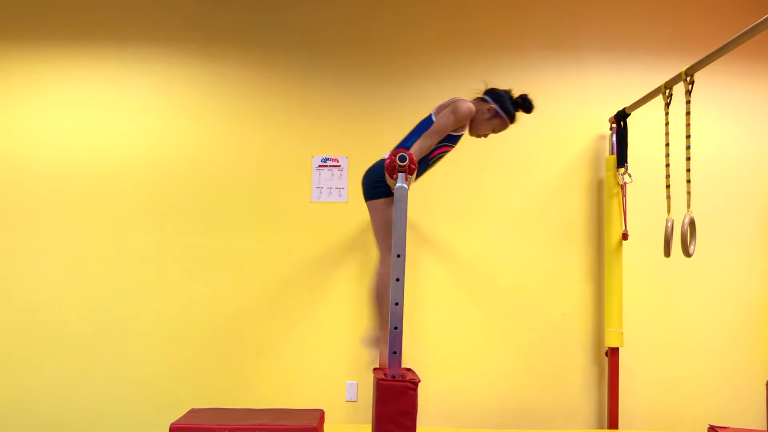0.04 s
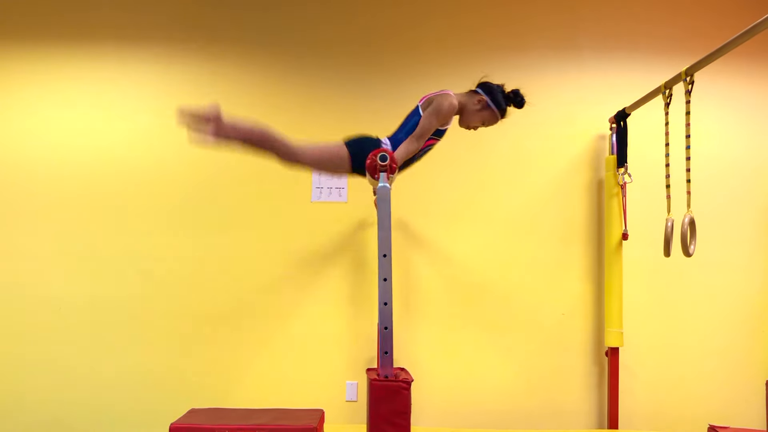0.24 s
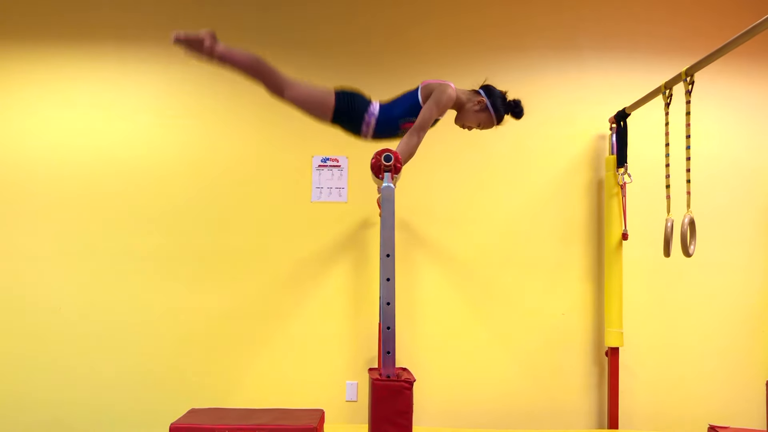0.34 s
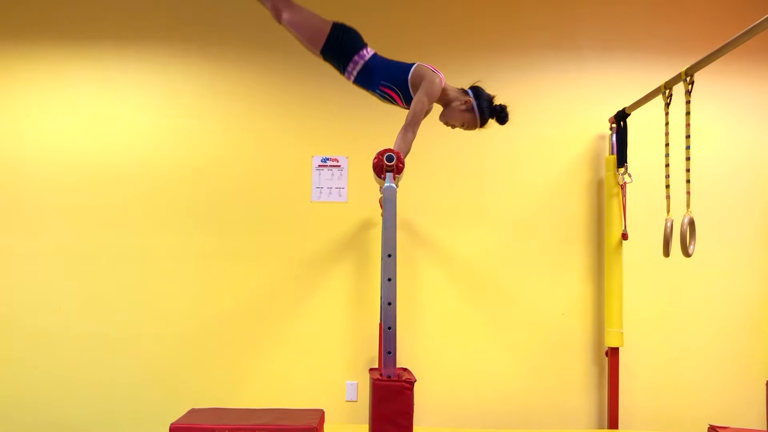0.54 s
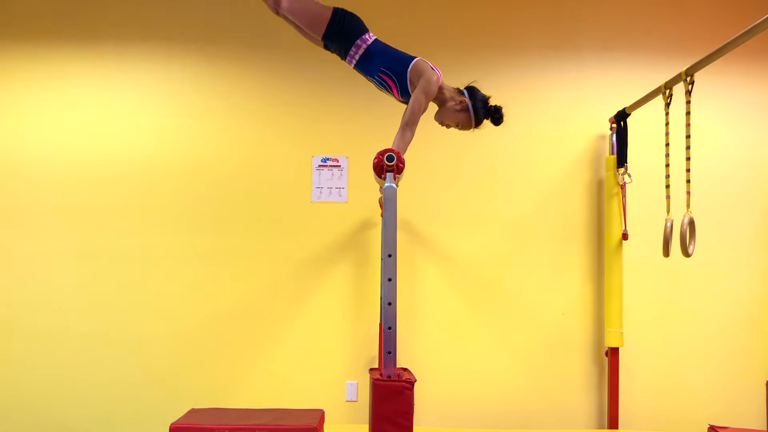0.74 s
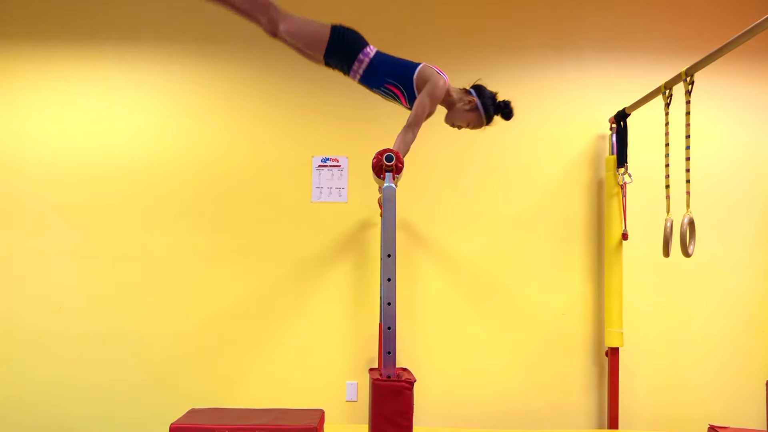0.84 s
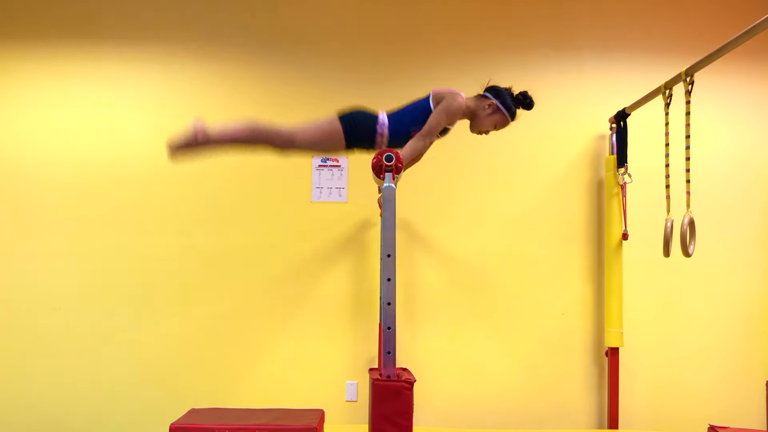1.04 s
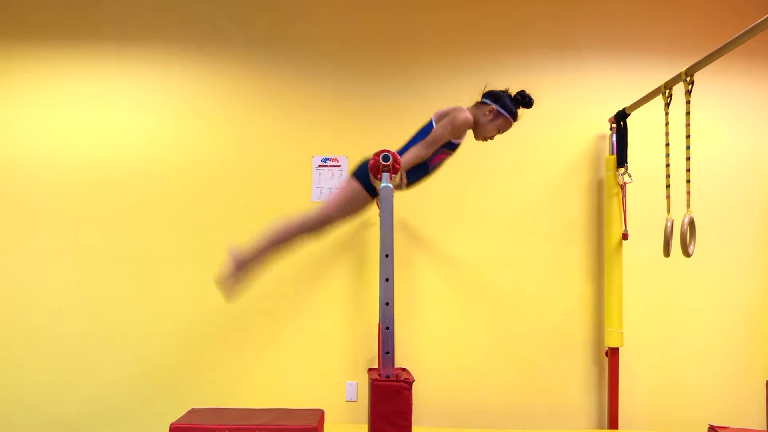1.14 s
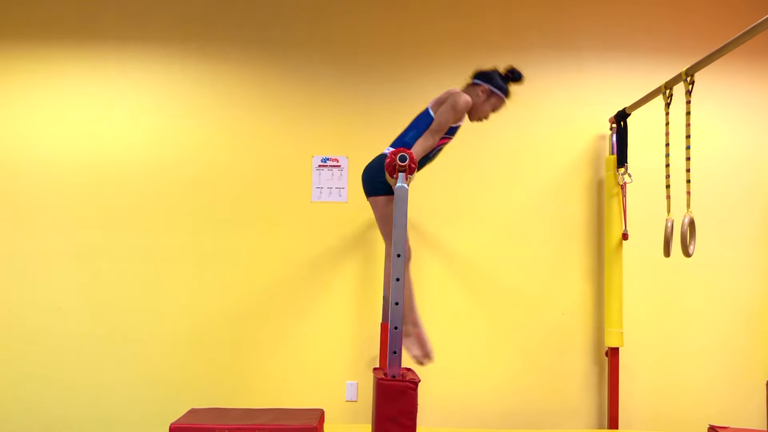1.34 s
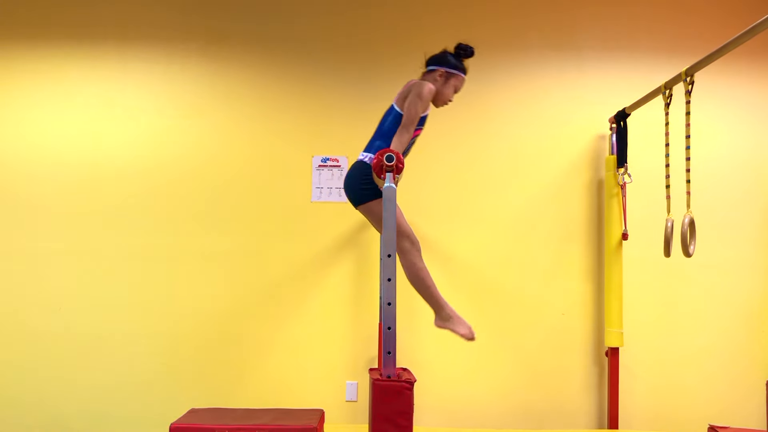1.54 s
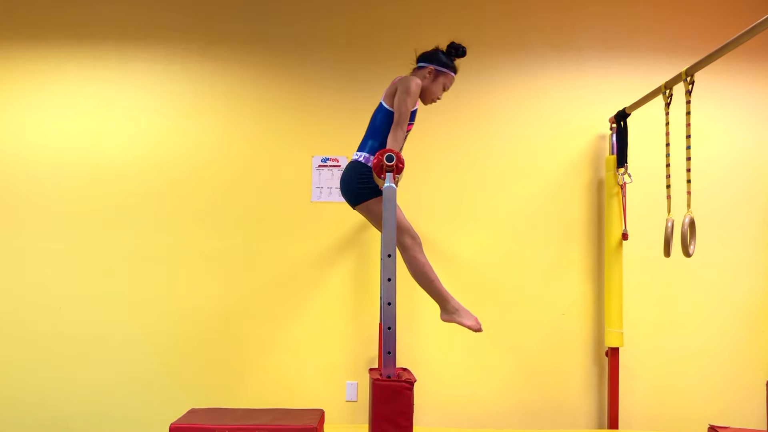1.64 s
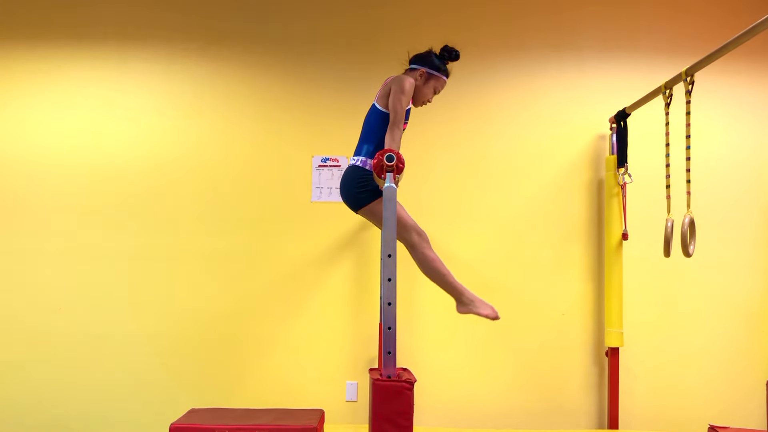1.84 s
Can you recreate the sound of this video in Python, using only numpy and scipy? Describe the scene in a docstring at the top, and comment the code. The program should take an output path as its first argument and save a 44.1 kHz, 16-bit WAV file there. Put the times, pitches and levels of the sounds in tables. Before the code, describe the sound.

A steel gymnastics bar clanks and rattles sharply as a gymnast swings off and lands back

```python
"""Gymnast on a steel bar

A gymnast swings away from a bar and back to support, in a reverberant gym, over rumbling ventilation.
The steel fittings clank and rattle in their play as the load changes: noise cracks plus ringing, blurred tones.
Her hips land on the rail with dull thuds, made of low damped sines and soft puffs of noise.
Her hands rub round it as grainy noise with a faint ring, and squeak as short gliding tones."""
import sys
import numpy as np
from scipy import signal
from scipy.fft import rfft, irfft, next_fast_len
from scipy.io import wavfile
from scipy.ndimage import map_coordinates

SR = 44100
rng = np.random.default_rng(int(sys.argv[2]) if len(sys.argv) > 2 else 0)


def generate_wav(sig):
    """Save sig (samples, or channels by samples) to the path in sys.argv[1] as 16-bit PCM at SR."""
    pcm = np.round(np.clip(np.atleast_2d(sig).T, -1, 1) * 32767).astype(np.int16)
    wavfile.write(sys.argv[1], SR, pcm)


N = 83790  # length in samples
T = np.arange(N) / SR  # time in seconds

# Colour of the ventilation's rumble. Each row: frequency in Hz, relative level in dB per Hz.
RUMBLE_COLOUR = [(20, -2), (38, -11), (55, 4), (78, -13.5), (125, -5), (200, -19.5), (400, -30.5),
                 (1000, -44), (4000, -46.5), (15000, -56.5)]
# Ventilation hum. Each row: frequency in Hz, level in dB.
HUM_TONES = [(58.5, -52.5), (115, -71.5)]
# Metal contacts in the fittings. Each row: start in seconds, level in dB, weight of the frame's low ring in dB,
# treble tilt in dB per octave, brightness limit in Hz.
METAL_CONTACTS = [(0.0376, -52, 4, 2, 10100), (0.0424, -48, -0.5, -7, 3030), (.196, -50, -1, 6, 8900),
                  (0.2384, -31, -25, 1, 6900), (0.2441, -26, -1.5, -1.5, 16000),
                  (0.2496, -29.5, -9, -0.5, 16700), (0.2554, -28, -1, 2.5, 16000),
                  (.263, -40, 1, 14, 15900), (0.286, -38.5, -24, 3.5, 11700), (0.326, -48, -11, 9, 9100),
                  (0.346, -39, -22, 5.5, 16100), (0.37, -41.5, -6.5, 1.5, 12100),
                  (0.39, -39.5, -18, 6.5, 11300), (.437, -45, -20, 4, 15800), (.452, -46, -9, 7.5, 14400),
                  (.647, -47, -8.5, -1, 3060), (0.658, -53, 0, -4, 4980), (0.767, -60.5, -12, -2, 8900),
                  (1.098, -67.5, -5, -3, 5000), (1.5276, -30.5, -6, 2, 9000), (1.536, -41.5, -1, -9, 12000),
                  (1.546, -59, -13, 1, 9100), (1.569, -39, -1, 0.5, 13600), (1.58, -38.5, -13, 1, 8100),
                  (1.595, -40, -16, -6, 12300), (1.604, -41.5, -6, 1.5, 14000), (1.616, -50, -1, 3, 9000)]
# Colour of a metal crack. Each row: frequency in Hz, relative level in dB per Hz.
CRACK_COLOUR = [(150, -10), (400, -18), (1000, -2), (2000, -3), (3900, -2.5), (4700, -6.5), (6000, -3),
                (9000, -12), (15500, -20)]
# Ringing tones of the steel fittings. Each row: frequency in Hz, relative level in dB,
# time to fall 60 dB in seconds.
STEEL_MODES = [(2256, -29, .3), (2565, -25, .8), (2688, -16, .18), (2953, -25, .2), (3713, -22, .4),
               (3785, -13, .1), (3884, -9, .06), (3954, -9, .05), (4231, -28, .25), (4861, -28, .25),
               (5665, -17, .13), (6153, -26, .22), (7430, -32, .6)]
# Ringing tones of the frame. Each row: frequency in Hz, relative level in dB, time to fall 60 dB in seconds.
FRAME_MODES = [(142.3, -3, 0.08), (247, -6.5, 0.054), (358.2, -1.5, 0.11), (490, -10.5, 0.075),
               (711.8, -1, 0.085), (1053, -14.5, .07), (1303, -6, 0.07), (1795, -10.5, 0.059)]
# Soft blows of the body on the rail. Each row: start in seconds, relative level in dB, pitch in Hz.
BODY_BLOWS = [(.042, -48.5, 492), (.052, -41.5, 360), (0.073, -47.5, 300), (.085, -41.5, 125),
              (0.103, -46.5, 154), (0.126, -51, 217), (0.2159, -33, 233), (0.227, -50, 420),
              (.2535, -33.5, 760), (.254, -30.5, 333), (.266, -36.5, 97), (0.498, -49, 292),
              (0.523, -51, 670), (.545, -55, 304), (.585, -51, 287), (0.658, -50.5, 313), (1.161, -48, 418),
              (1.222, -35, 280), (1.235, -30.5, 139), (1.256, -35.5, 385), (1.346, -36, 330),
              (1.489, -33.5, 245), (1.508, -40.5, 437), (1.537, -33, 299), (1.603, -38.5, 887),
              (1.613, -38.5, 131)]
# Skin and cloth sliding on the rail. Each row: start in seconds, rise in seconds,
# time to fall 60 dB in seconds, level in dB, treble tilt in dB per octave.
SLIDES = [(0.057, 0.0047, 0.23, -50, -1.5), (0.103, 0.011, 0.13, -47.5, -3),
          (.862, 0.011, 0.071, -47.5, -0.5), (1.176, 0.019, 0.42, -47.5, -4.5),
          (1.209, 0.021, 0.12, -32, 2.5), (1.251, 0.0083, 0.15, -37, -4.5), (1.328, 0.03, 0.12, -35, 0)]
# Colour of the sliding noise. Each row: frequency in Hz, relative level in dB per Hz.
RUB_COLOUR = [(150, -0.5), (500, -2), (1300, -3.5), (2200, -4.5), (4000, -2.5), (6000, 1), (9500, 0.5),
              (11500, -11), (15500, -10)]
# Stick-slip squeals of the grip. Each row: start in seconds, length in seconds, first pitch in Hz,
# last pitch in Hz, level in dB, overtone level in dB, pitch roughness as a fraction.
GRIP_SQUEALS = [(0.574, 0.0042, 1930, 1700, -53.5, -40, 0.12), (1.2051, 0.01, 8160, 7700, -30.5, -25, 0.01),
                (1.2077, 0.0052, 6570, 6260, -33, -10, 0.029),
                (1.209, 0.032, 5113, 4427, -36.5, -3.5, 0.046),
                (1.225, 0.019, 2922, 2956, -38.5, -10, 0.021),
                (1.322, 0.012, 6250, 6440, -40.5, -9, 0.0088), (1.330, 0.0258, 2850, 2972, -46, 10, 0.033),
                (1.333, 0.033, 10420, 10370, -43, -28, .016), (1.337, 0.038, 7520, 7660, -42.5, -26, 0.021),
                (1.344, 0.0141, 1994, 1895, -42.5, -17, 0.014), (1.35, 0.036, 3830, 3874, -44.5, -13, 0.01)]
# Fading of the hall's echo. Each row: frequency in Hz, time to fall 60 dB in seconds.
HALL_FADE = [(100, 1), (400, 0.57), (1500, 0.56), (4000, 0.62), (8000, 0.59), (15000, 0.35)]

# Names in _T60 are the seconds a sound takes to fall 60 dB; those in _RATE are knots of a random curve a second.
RUMBLE_DB = -52
CRACK_T60, CRACK_DB = 0.053, -0.5
CHATTER_T60, CHATTER_DB, CHATTER_RATE, CHATTER_GRAIN_DB = 0.49, -20.5, 300, 2.5
CONTACT_S = 0.00039  # time for a contact to build
STEEL_DB, FRAME_DB, MODE_SCATTER_DB = -3, -3, 2
MODE_BLUR, MODE_BLUR_KNOTS = 0.45, 150  # phase step in radians, knots over one second
THUD_T60, THUD_ATTACK_S, THUD_TONE_DB, THUD_PUFF_DB = 0.041, 0.0011, -3, -5.5
PUFF_REACH = 2.47  # the puff weakens above this many times the thud's pitch
SOFT_HZ = 1590  # flesh passes little above this
RUB_GRAIN_DB, RUB_GRAIN_RATE = 2, 605
RUB_RING_DB, RUB_RING_TILT_DB = -3, 7  # level, treble tilt per octave
OVERTONE_FALL_DB, SLIP_RATE = 4.5, 720  # fall from one overtone to the next, pace of the rough pitch
STUTTER_DB, STUTTER_RATE = 0.5, 270
CLANK_ROOM_DB, THUD_ROOM_DB, RUB_ROOM_DB, SQUEAK_ROOM_DB = -8.5, -9, -7.5, -10  # level of the hall's tail
HALL_BUILD_S = 0.0058
EARLY_T60, EARLY_DB, EARLY_BUILD_S = 0.11, -4, 0.0019
LOW_CUT_HZ, TOP_HZ = 53.4, 15800


def amp(db):
    """Turn decibels into gain."""
    return 10 ** (np.asarray(db) / 20)


def unit(x):
    """Scale to an rms of 1."""
    return x / np.sqrt(np.mean(x ** 2) + 1e-20)


def along(points, hz):
    """Read a curve between (Hz, value) points, on a log frequency axis."""
    point_hz, value = np.transpose(points)
    return np.interp(np.log(hz + 1), np.log(point_hz + 1), value)


def wobble(rate):
    """Draw a smooth random curve with so many knots a second."""
    return map_coordinates(rng.standard_normal(N), [T * rate], mode="wrap")


def filtered(x, response):
    """Change the strength of each frequency in x by the given response."""
    size = next_fast_len(N + SR // 2)
    hz = np.fft.rfftfreq(size, 1 / SR)
    return irfft(rfft(x, size) * response(hz), size)[:N]


def octaves(hz):
    """Count octaves from the mid treble, the pivot about which colours tilt."""
    return np.log2(np.maximum(hz, 700) / 3500)


def noise(colour, tilt_db=0):
    """Make coloured noise with an rms of 1."""
    def response(hz):
        return amp(along(colour, hz) + tilt_db * octaves(hz))
    return unit(filtered(rng.standard_normal(N), response))


def decay(t60):
    """Fall by 60 dB in t60 seconds."""
    return np.exp(-np.log(1000) * T / max(t60, 1e-3))


def build(seconds):
    """Rise smoothly from 0 towards 1; larger times rise more slowly."""
    return 1 - np.exp(-T / seconds)


def add(track, s, sound):
    """Mix a sound in from time s."""
    start = max(round(s * SR), 0)
    track[start:] += sound[:N - start]


def ring(modes, tilt_db=0):
    """Ring struck modes with scattered levels; a random phase walk blurs each tone into a narrow band."""
    out = np.zeros(N)
    t = T[:SR].astype(np.float32)  # each ring lasts at most one second
    knots = np.linspace(0, 1, MODE_BLUR_KNOTS)
    for hz, db, t60 in modes:
        gain = amp(db + MODE_SCATTER_DB * rng.normal() + tilt_db * octaves(hz))
        walk = MODE_BLUR * np.cumsum(rng.standard_normal(len(knots)))
        blur = np.interp(t, knots, walk).astype(np.float32)
        tone = np.sin(2 * np.pi * (float(hz) * t + rng.random()) + blur)
        out[:SR] += gain * tone * np.exp(float(-np.log(1000) / t60) * t)
    return out


def ventilation():
    """Moving air makes a low noisy rumble, with hum tones that waver in level and phase."""
    hum = np.zeros(N)
    for hz, db in HUM_TONES:
        level = np.sqrt(2) * amp(db + 0.53 * wobble(5.3))
        hum += level * np.sin(2 * np.pi * hz * T + 1.2 * wobble(5.94))
    return hum + amp(RUMBLE_DB) * noise(RUMBLE_COLOUR)


def clanks():
    """Each contact cracks, leaves loose parts chattering, and rings the fittings and the frame."""
    out = np.zeros(N)
    grain = unit(amp(CHATTER_GRAIN_DB * wobble(CHATTER_RATE)))
    for s, db, frame_db, tilt_db, limit_hz in METAL_CONTACTS:
        # Rolling back by the start keeps one chatter pattern in step across all contacts.
        chatter = amp(CHATTER_DB) * decay(CHATTER_T60) * np.roll(grain, -round(s * SR))
        envelope = np.hypot(amp(CRACK_DB) * decay(CRACK_T60), chatter)
        crack = noise(CRACK_COLOUR, tilt_db) * envelope
        steel = amp(STEEL_DB) * ring(STEEL_MODES, tilt_db)
        frame = amp(FRAME_DB + frame_db) * ring(FRAME_MODES)
        blow = (crack + steel + frame) * build(CONTACT_S)
        lowpass = signal.butter(2, min(limit_hz, SR / 2 - 1), fs=SR, output="sos")
        add(out, s, amp(db) * signal.sosfilt(lowpass, blow))
    return out


def thuds():
    """Each soft blow makes a damped low swing and a dull puff, since flesh passes little treble."""
    out = np.zeros(N)
    for s, db, hz in BODY_BLOWS:
        def puff_response(f):
            bass_cut = f / (f + hz / 2)
            reach = 1 + (f / (PUFF_REACH * hz)) ** 3
            softness = 1 + (f / SOFT_HZ) ** 4
            return bass_cut / reach / softness
        puff = unit(filtered(rng.standard_normal(N), puff_response))
        swing = amp(THUD_TONE_DB) * np.sin(2 * np.pi * hz * T)
        blow = swing + amp(THUD_PUFF_DB) * puff
        add(out, s, 2 * amp(db) * blow * decay(THUD_T60) * build(THUD_ATTACK_S))
    return out


def rubs():
    """Sliding friction swells and dies as grainy noise, and sets the steel ringing."""
    out = np.zeros(N)
    for s, rise, t60, db, tilt_db in SLIDES:
        swell = np.minimum(T / rise, 1)
        fade = np.exp(-np.log(1000) * np.maximum(T - rise, 0) / t60)
        grain = unit(noise(RUB_COLOUR, tilt_db) * amp(RUB_GRAIN_DB * wobble(RUB_GRAIN_RATE)))
        steel = amp(RUB_RING_DB) * ring(STEEL_MODES, RUB_RING_TILT_DB)
        add(out, s, amp(db) * swell * (fade * grain + steel))
    return out


def squeaks():
    """The palms stick and slip in short, unsteady squeals with overtones."""
    out = np.zeros(N)
    for s, length, first_hz, last_hz, db, overtone_db, rough in GRIP_SQUEALS:
        progress = np.clip(T / length, 0, 1)
        glide = first_hz + (last_hz - first_hz) * progress
        pitch = glide * (1 + rough * wobble(SLIP_RATE))
        phase = 2 * np.pi * np.cumsum(pitch) / SR
        tone = np.sin(phase)
        for k in range(2, 6):
            if k * first_hz < SR / 2:  # leave out overtones too high for the sample rate
                tone += amp(overtone_db - OVERTONE_FALL_DB * (k - 1.5)) * np.sin(k * phase)
        stutter = unit(amp(STUTTER_DB * wobble(STUTTER_RATE)))
        swell = np.sqrt(2 * np.abs(np.sin(np.pi * progress)))
        add(out, s, amp(db) * stutter * swell * tone)
    return out


def gym(x, room_db):
    """Add a flurry from the near wall and the hall's tail, whose highest treble dies first."""
    hz, t, z = signal.stft(rng.standard_normal(SR), SR, nperseg=256)
    fade = np.exp(-np.log(1000) * t / along(HALL_FADE, hz)[:, None])
    tail = signal.istft(z * fade, SR, nperseg=256)[1][:SR]
    tail = tail * build(HALL_BUILD_S)[:SR]
    early = (rng.standard_normal(N) * decay(EARLY_T60) * build(EARLY_BUILD_S))[:SR]
    answer = amp(room_db) * tail / np.linalg.norm(tail)
    answer = answer + amp(EARLY_DB) * early / np.linalg.norm(early)
    return x + signal.fftconvolve(x, answer)[:N]


def scene():
    """Mix the ventilation with the bar and the gymnast in the hall."""
    bar = gym(clanks(), CLANK_ROOM_DB) + gym(thuds(), THUD_ROOM_DB)
    hands = gym(rubs(), RUB_ROOM_DB) + gym(squeaks(), SQUEAK_ROOM_DB)
    return (ventilation() + bar + hands)[None]


def record(dry):
    """Weaken the deepest bass and keep nothing from the top limit upwards."""
    def response(hz):
        bass_cut = 1 - 1 / (1 + (hz / LOW_CUT_HZ) ** 6)
        return (hz < TOP_HZ) * bass_cut
    return filtered(dry[0], response)[None]


dry = scene()
out = record(dry)
generate_wav(out)
```